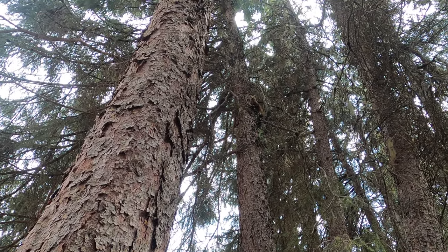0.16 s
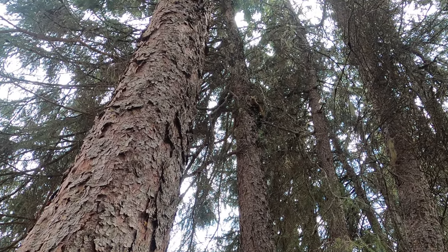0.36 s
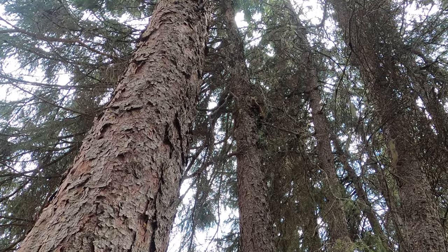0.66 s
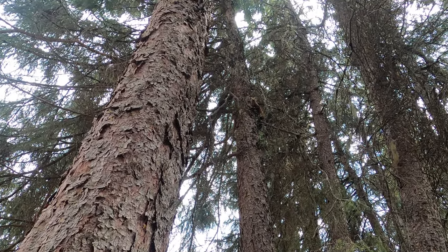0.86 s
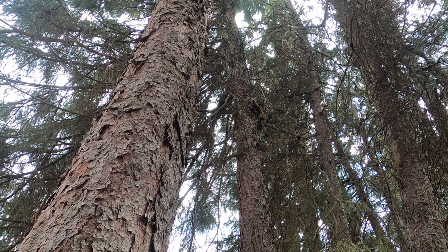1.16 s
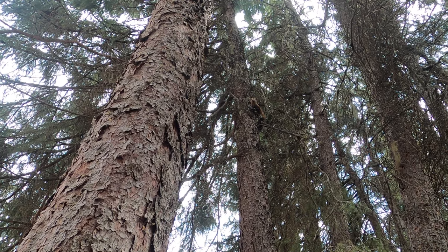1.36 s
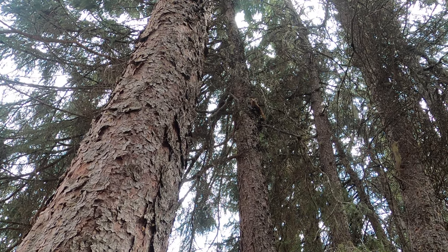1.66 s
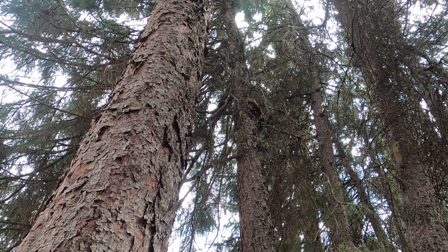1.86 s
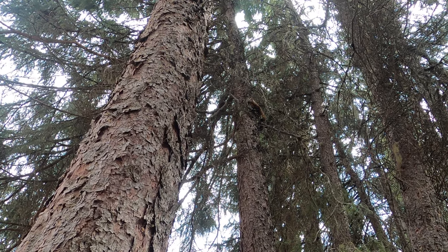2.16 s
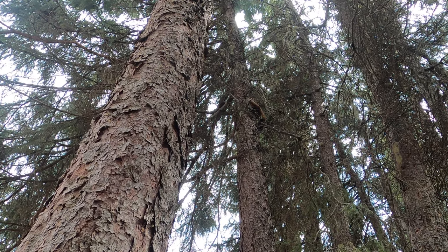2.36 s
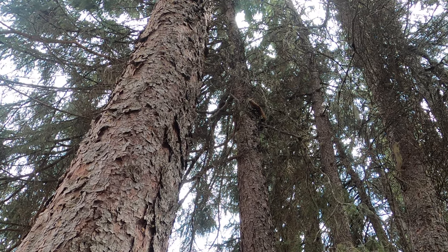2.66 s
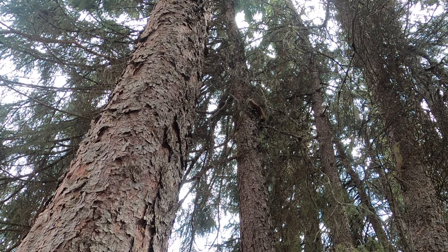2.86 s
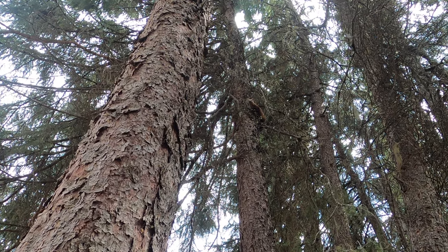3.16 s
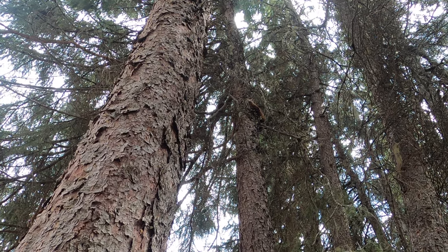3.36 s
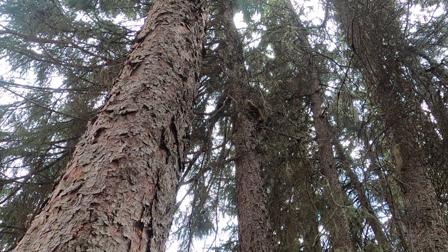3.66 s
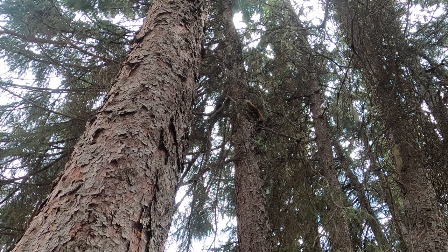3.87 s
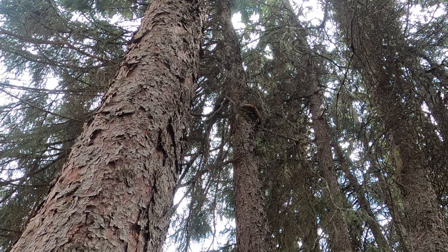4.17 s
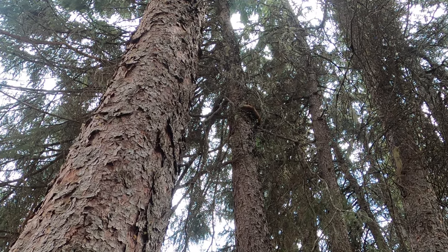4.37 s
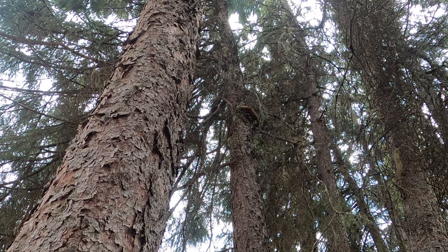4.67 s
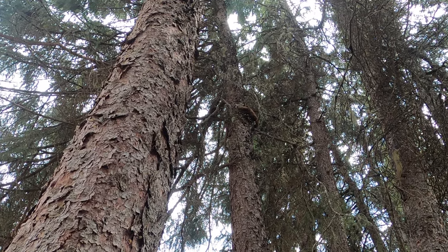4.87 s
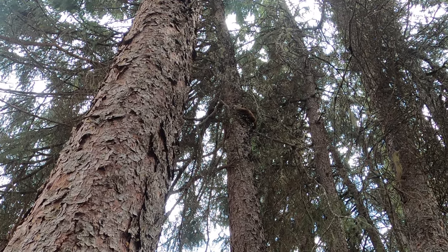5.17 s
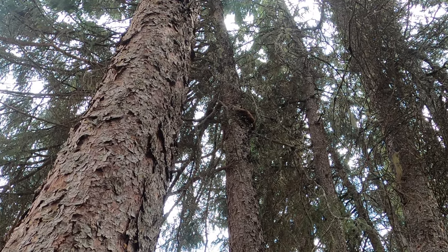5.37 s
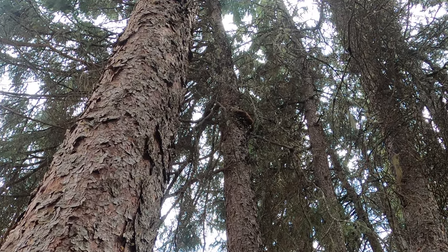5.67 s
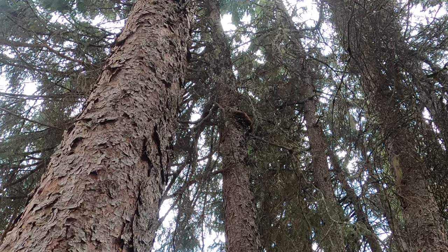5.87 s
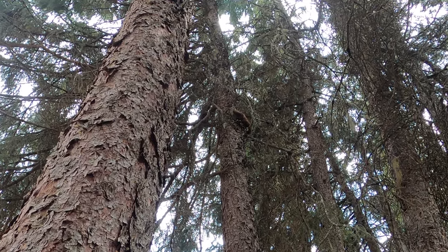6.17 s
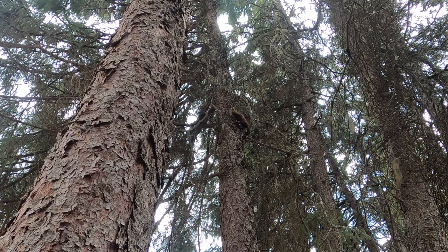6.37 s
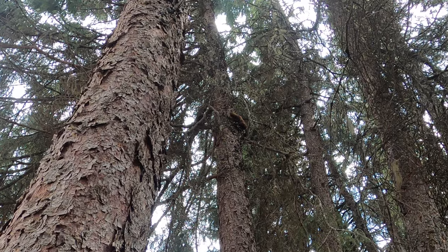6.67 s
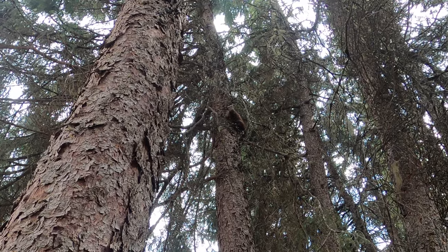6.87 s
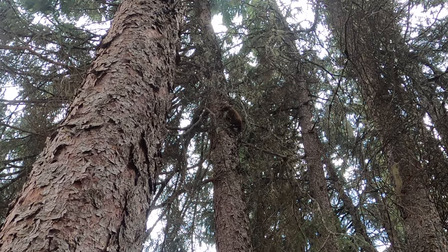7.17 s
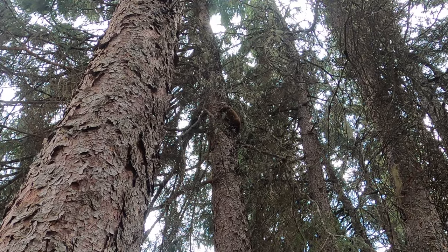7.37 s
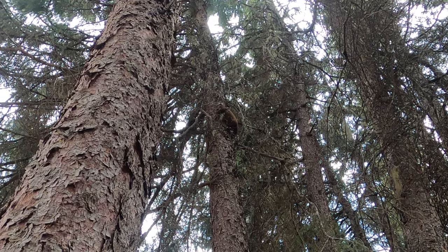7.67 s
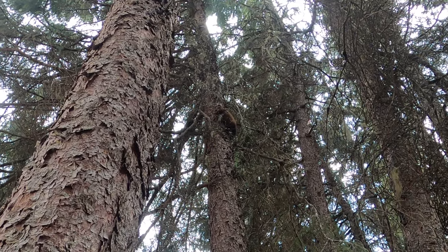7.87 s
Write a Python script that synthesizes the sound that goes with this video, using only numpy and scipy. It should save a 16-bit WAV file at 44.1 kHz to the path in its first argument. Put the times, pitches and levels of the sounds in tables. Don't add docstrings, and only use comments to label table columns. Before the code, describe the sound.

Bassy, fluttering wind thuds dominate, with tight slaps on the right side and softer gusts on the left. Far crowns hiss smoothly and quietly underneath, with light dry needle brushing and tiny ticks. Three brief bird chips come early from the left, echoing slightly between trunks. A tiny dip marks a scene change at two and a half seconds. Later the wind dies in puffs until mostly soft forest air remains.

```python
import sys
import numpy as np
from scipy import signal
from scipy.fft import rfft, irfft, next_fast_len
from scipy.io import wavfile
from scipy.ndimage import uniform_filter1d, map_coordinates

SR = 44100
rng = np.random.default_rng(int(sys.argv[2]) if len(sys.argv) > 2 else 0)


def volts(x):
    e = np.asarray(x, float) / 20
    return 10 ** e


def generate_wav(sig):
    pcm = np.round(np.clip(np.atleast_2d(sig).T, -1, 1) * 32767).astype(np.int16)
    wavfile.write(sys.argv[1], SR, pcm)


N = 354123
BLOCK = 64


def unit(x):
    return x / np.sqrt(np.mean(x ** 2) + 1e-20)


def along(points, hz):
    f, v = np.transpose(points)
    return np.interp(np.log(hz + 1), np.log(f + 1), v)


def curves(rows):
    s, *cols = np.transpose(rows)
    return [np.interp(np.arange(N) / SR, s, c) for c in cols]


def wobble(rate):
    knots = rng.standard_normal(int(N * rate / SR) + 4)
    return map_coordinates(knots, [np.arange(N) * rate / SR])


def filtered(x, response):
    n = x.shape[-1]
    m = next_fast_len(n + SR // 2)
    return irfft(rfft(x, m) * response(np.fft.rfftfreq(m, 1 / SR)), m)[..., :n]


def panned(x, lean_db):
    return x * volts(np.array([lean_db / 2, -lean_db / 2]).reshape(2, -1))


def swells(rows, shape):
    s, db, fall = np.transpose(rows)[:3, :, None]
    t = np.arange(0, N + BLOCK, BLOCK) / SR
    return volts(2 * db - 40 * (np.abs(t - s) / fall) ** shape)


def per_sample(v):
    return np.interp(np.arange(N), BLOCK * np.arange(len(v)), v)


# t/s, level/dB
CROWN_LEVEL = [(0.0, -59.5), (1.14, -58), (2.24, -59), (2.84, -59), (4.05, -59), (4.92, -58), (5.95, -58.5),
               (8.03, -56.5)]
# f/Hz, level/dB
SIGH_COLOUR = [(20, -3.5), (60, -7), (115, -12.5), (170, -7), (300, -13.5), (450, -11.5), (880, -10),
               (1020, -4.5), (1400, -3), (2300, -6.5), (4000, -14.5), (6500, -27), (8200, -40.5),
               (11000, -68)]
# f/Hz, likeness/1
PORT_LIKENESS = [(60, .6), (210, .4), (390, .65), (740, .82), (1400, .82), (2600, .68), (4500, .33),
                 (7000, .15)]
# f/Hz, left minus right level/dB
SIGH_LEAN = [(60, -6.5), (140, -3), (350, -1.5), (840, -1), (2010, 3), (4840, 0.5)]
# f/Hz, phase/rad
LEFT_LEAD = [(0, -0.05), (260, -0.37), (690, -0.3), (1550, -0.38), (3190, -0.48), (4050, -1.6),
             (5000, 0.29)]


def crowns():
    def shared_and_not(hz):
        turn = np.arccos(np.clip(along(PORT_LIKENESS, hz), -1, 1)) / 2
        return volts(along(SIGH_COLOUR, hz)) * [np.cos(turn), np.sin(turn)]

    def to_ports(hz):
        half = volts(along(SIGH_LEAN, hz) / 2) * np.exp(.5j * along(LEFT_LEAD, hz))
        return np.array([half, 1 / half])

    level_db, = curves(CROWN_LEVEL)
    mid, side = filtered(rng.standard_normal((2, N)), shared_and_not)
    pair = filtered(np.array([mid + side, mid - side]), to_ports)
    return volts(level_db + 1.43 + 0.44 * wobble(5)) * unit(pair)


# t/s, level/dB, left minus right level/dB
RUSTLE_BED = [(0, -89, 5), (1.5, -91, 4), (2.2, -98, 2), (3.3, -96, 1), (4.4, -98, 0), (8.03, -96, -2)]
# t/s, peak level/dB, time to fall 20 dB/s
BRUSHES = [(0.01, -86, .2), (.25, -80, .17), (.46, -88, .15), (.75, -87, .2), (.9, -88, .2),
           (1.11, -81, .22), (1.48, -90, .2), (1.68, -88, .12), (2.01, -86, .17), (2.46, -85, .17),
           (2.72, -94, .2), (3.1, -84, .2), (3.23, -87, .17), (3.37, -93, .1), (3.68, -91, .12),
           (3.94, -88, .15), (4.3, -93, .15), (4.85, -96, .2), (6.55, -96, .2), (7.3, -87, .17),
           (7.52, -91, .15)]
# f/Hz, level/dB
NEEDLE_COLOUR = [(2500, -45), (5000, -4), (7000, 1.5), (9000, -7.5), (11000, -11.5), (13000, -17.5),
                 (14800, -33), (17000, -80)]


def needles():
    bed_db, lean_db = curves(RUSTLE_BED)
    brushed = swells(BRUSHES, shape=1.4).sum(0)
    strength = np.sqrt(volts(2 * bed_db) + per_sample(brushed))
    clumps_db = np.array([2.3 * wobble(180) + 1.1 * wobble(25) for port in "LR"])
    grains = rng.standard_normal((2, N)) * volts(clumps_db)
    rustle = unit(filtered(grains, lambda hz: volts(along(NEEDLE_COLOUR, hz))))
    return panned(volts(4.5) * strength * rustle, lean_db)


# t/s, peak level/dB, left minus right level/dB
TICKS = [(0.038, -68, -2), (0.2507, -72, 3), (0.4444, -80, -0.5), (0.4638, -79, -1), (0.5341, -84, 0.5),
         (0.8344, -80, 0.5), (1.1134, -53.5, 9), (1.116, -56, 9), (1.6833, -74, 8), (2.4578, -74, 9),
         (2.5204, -82, 3), (3.0878, -78, 1.5), (3.6696, -80, -8), (3.9294, -87, 0.1), (4.2862, -76, -5)]
# f/Hz, width/Hz, level/dB
TWIG_MODES = [(5200, 700, -3), (6600, 900, -14), (7600, 600, -11), (8800, 350, 6), (10300, 900, -12),
              (12500, 1800, -15), (14600, 1000, -14)]


def ticks():
    def wood(f):
        total = 0
        for k, (centre, width, db) in enumerate(TWIG_MODES):
            mode = 1j * f * width / (centre * centre - f * f + 1j * f * width)
            total = total + (-1) ** k * volts(db) * mode
        return total / (1 + 1j * f / 9000) ** 2

    ring_s = .0036
    blows, t = np.zeros((2, N + SR)), np.arange(500) / SR
    for s, db, pan_db in TICKS:
        snap = rng.standard_normal(len(t)) + 3.0 * (t == 0)
        crack = volts(db + 2.5 - 20 * t / ring_s) * snap
        blows[:, round(s * SR):][:, :len(t)] += panned(crack, pan_db)
    return volts(11.5) * filtered(blows[:, :N], wood)


def note(shape, top_hz):
    when, share, db = np.transpose(shape)
    t = np.arange(-1323, 1323) / SR
    on = (t > when[0]) & (t < when[-1])
    phase = 2 * np.pi * np.cumsum(top_hz * np.interp(t, when, share)) / SR
    return on * volts(np.interp(t, when, db)) * np.sin(phase)


# t/s, peak level/dB, top f/Hz, flick level/dB
CHIPS = [
    (.356, -52, 4030, -23),
    (1.314, -53.5, 3950, -13),
    (2.507, -52, 4030, -20),
    (6.447, -59, 3860, -16),
]
# t/s, pitch share of top/1, level/dB
ARCH = [(-.009, .82, -27), (-.002, .91, -16), (.002, .95, -1.5), (.006, 1, -1.5), (.012, 1, -0.5),
        (.015, .94, -1), (.018, .91, -26)]
# t/s, pitch share of top/1, level/dB
FLICK = [(-.022, 1.13, -18.5), (-.018, 1.2, 0), (-.012, 1.4, -0.5), (-.007, 1.62, -8.5), (-.004, 1.7, -23)]


def bird():
    chips = np.zeros(N)
    for s, db, hz, flick_db in CHIPS:
        call = note(ARCH, hz) + volts(flick_db) * note(FLICK, hz)
        chips[round(s * SR) - 1323:][:2646] += volts(db - 1.0) * call
    t = np.arange(SR // 2) / SR
    fade = volts(-60 * t / .6) + .7 * volts(-60 * t / .06)
    tail = rng.standard_normal((2, len(t))) * fade * (1 - np.exp(-t / 0.0052))
    echo = signal.fftconvolve(chips[None], tail / np.linalg.norm(tail[0]), axes=1)[:, :N]
    return panned(chips, 9.1) + panned(echo, 4)


# t/s, level/dB, flow/(eddies a second)
LULL = [(0, -69, 55), (6.9, -68, 60), (7.5, -65, 50), (7.7, -72, 60), (8.03, -73, 60)]


def gusts(rows, shape):
    lull_db, lull_flow = curves(LULL)
    lull = volts(2 * lull_db)
    power = swells(rows, shape)
    total = per_sample(power.sum(0)) + lull
    flow = per_sample(np.transpose(rows)[3] @ power) + lull_flow * lull
    return 10 * np.log10(total), flow / total


# f/Hz, level/dB
EDDIES = [(5, -12), (25, 3), (60, 0), (90, -7.5), (120, -15), (160, -25.5), (200, -36.5), (280, -53),
          (400, -94)]
# f/Hz, level/dB
PORT_COLOUR = [(5, -30), (15, -15), (25, -7), (38, -2), (60, 0), (270, 0), (330, -8), (450, -32)]
FLOWS = [30, 45, 65, 90, 125]


def buffet(rows, shape, steady):
    level_db, passing = gusts(rows, shape)
    white = rng.standard_normal(N) * volts(5.2 * wobble(75))
    place = np.interp(np.log(passing), np.log(FLOWS), np.arange(len(FLOWS))) + 0.24 * wobble(22)
    push = np.zeros(N)
    for k, v in enumerate(FLOWS):
        drawn = filtered(white, lambda hz: volts(along(EDDIES, hz * 60 / v) + along(PORT_COLOUR, hz)))
        push += np.clip(1 - np.abs(place - k), 0, 1) * unit(drawn)
    push = push * volts(3.0 * wobble(28))
    smooth = uniform_filter1d(uniform_filter1d(push ** 2, size=1800), size=1800)
    power = np.abs(smooth) + 0.037
    return volts(level_db) * unit(push / power ** (steady / 2))


# t/s, peak level/dB, time to fall 20 dB/s, flow/(eddies a second)
LEFT_GUSTS = [(0.065, -42.0, 0.103, 50), (0.175, -41.1, 0.065, 47), (0.377, -46.4, 0.19, 43),
              (0.653, -44.3, 0.187, 47), (0.796, -35.8, 0.06, 46), (1.107, -37.7, 0.09, 42),
              (1.335, -36.0, 0.118, 37), (1.568, -38.2, 0.051, 42), (1.735, -43.7, 0.221, 50),
              (1.942, -42.6, 0.11, 51), (2.094, -51.3, 0.128, 58), (2.22, -41.3, 0.03, 27),
              (2.322, -43.9, 0.219, 47), (2.475, -44.4, 0.114, 52), (2.665, -50.5, 0.45, 55),
              (2.924, -30.1, 0.049, 38), (3.314, -39.0, 0.176, 63), (3.528, -46.0, 0.369, 55),
              (3.747, -43.4, 0.107, 52), (3.974, -48.4, 0.22, 51), (4.133, -51.2, 0.24, 67),
              (4.624, -47.8, 0.18, 54), (5.254, -39.7, 0.101, 50), (5.81, -48.1, 0.45, 51),
              (5.917, -41.6, 0.03, 49), (6.084, -45.2, 0.044, 37), (6.203, -51.8, 0.105, 93),
              (6.371, -51.0, 0.046, 40), (6.559, -55.6, 0.45, 51), (7.539, -62.9, 0.03, 61)]


def left_port():
    return buffet(LEFT_GUSTS, shape=1.12, steady=0.71)


# t/s, peak level/dB, f/Hz
SLAPS = [(.302, -35.5, 130), (0.329, -48, 109), (1.637, -26, 120), (1.656, -25.5, 132), (1.702, -24, 147),
         (1.742, -28, 148), (1.839, -23, 95), (1.945, -35, 140), (2.311, -33, 150), (2.346, -31.5, 155),
         (2.592, -38, 117), (3.265, -26, 175), (3.297, -26, 149), (3.373, -31.5, 143), (3.667, -25, 148),
         (5.877, -44, 120)]


def slaps():
    out, t = np.zeros(N + SR), np.arange(-1000, 1000) / SR
    signs = np.sign(rng.standard_normal(len(SLAPS)))
    for (s, db, hz), sign in zip(SLAPS, signs):
        u = (np.pi * hz * t) ** 2
        out[round(s * SR) - 1000:][:len(t)] += sign * volts(db) * (1 - 2 * u) * np.exp(-u)
    return out[:N]


# t/s, peak level/dB, time to fall 20 dB/s, flow/(eddies a second)
RIGHT_GUSTS = [(0.011, -34.9, 0.125, 71), (0.176, -36.9, 0.051, 58), (0.327, -33.0, 0.097, 69),
               (0.581, -42.4, 0.03, 29), (0.666, -41.4, 0.186, 65), (0.772, -30.9, 0.045, 66),
               (1.103, -36.3, 0.101, 63), (1.317, -30.1, 0.103, 72), (1.549, -32.9, 0.05, 44),
               (1.693, -25.5, 0.131, 100), (1.838, -30.2, 0.03, 68), (1.968, -34.6, 0.285, 83),
               (2.206, -35.5, 0.049, 27), (2.29, -31.8, 0.03, 92), (2.43, -29.3, 0.173, 87),
               (2.591, -29.9, 0.03, 90), (2.669, -36.7, 0.07, 44), (2.865, -33.9, 0.111, 60),
               (3.286, -27.2, 0.1, 128), (3.372, -33.1, 0.207, 72), (3.691, -27.7, 0.098, 100),
               (3.943, -35.3, 0.111, 55), (4.082, -34.2, 0.108, 63), (4.23, -43.5, 0.105, 85),
               (4.452, -44.7, 0.107, 43), (4.622, -36.3, 0.092, 45)]
# t/s, peak level/dB, time to fall 20 dB/s, flow/(eddies a second)
RIGHT_PUFFS = [(5.233, -32.6, 0.062, 65), (5.389, -49.7, 0.356, 55), (5.688, -38.7, 0.03, 40),
               (5.759, -40.4, 0.157, 42), (5.875, -31.3, 0.052, 107), (5.953, -34.1, 0.05, 46),
               (6.125, -39.8, 0.149, 48), (6.357, -45.4, 0.064, 36), (6.535, -41.2, 0.118, 31),
               (6.721, -45.9, 0.127, 41), (6.92, -44.8, 0.053, 27)]


def right_port():
    rows = list(RIGHT_GUSTS) + list(RIGHT_PUFFS)
    return buffet(rows, shape=1.68, steady=0.95) + slaps()


def scene():
    background = crowns() + needles() + ticks() + bird()
    return background + np.array([left_port(), right_port()])


def top_cut(x):
    return signal.sosfilt(signal.butter(12, 15700, fs=SR, output="sos"), x)


# t/s, half width/s
BRIEF_DIP = (2.533, .0065)


def record(dry):
    s, half = BRIEF_DIP
    fade = np.clip(np.abs(np.arange(N) / SR - s) / half, 0, 1)
    return top_cut(dry * fade)


dry = scene()
out = record(dry)
generate_wav(out)
```